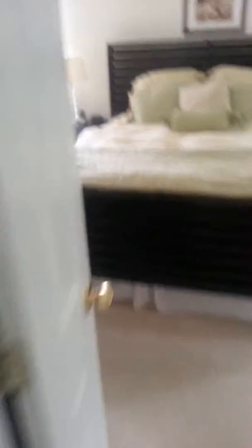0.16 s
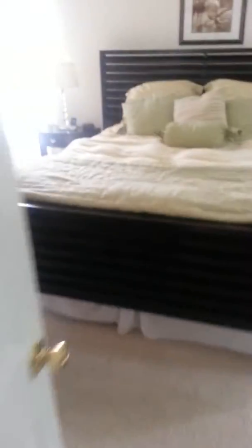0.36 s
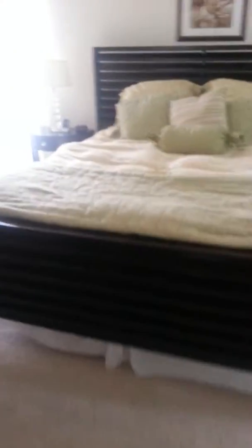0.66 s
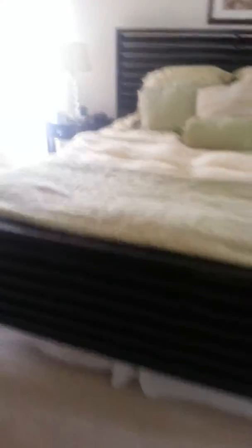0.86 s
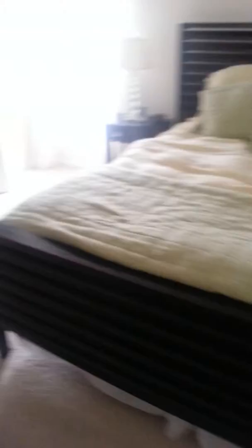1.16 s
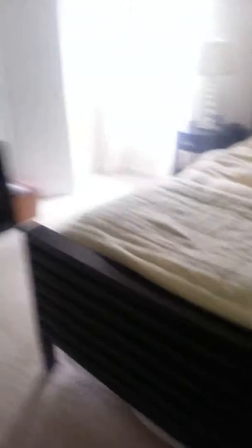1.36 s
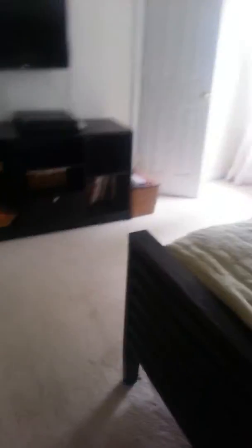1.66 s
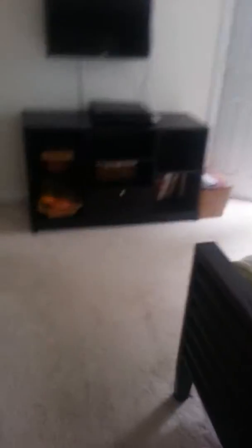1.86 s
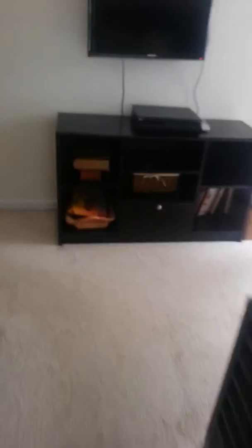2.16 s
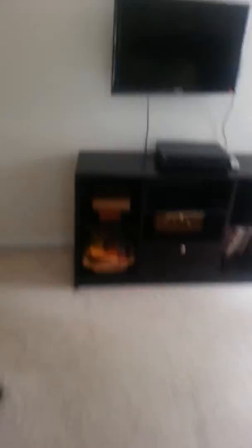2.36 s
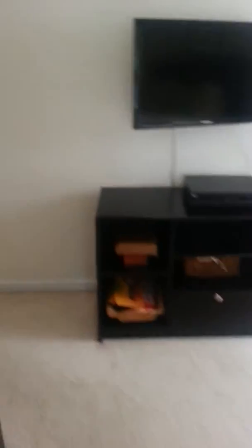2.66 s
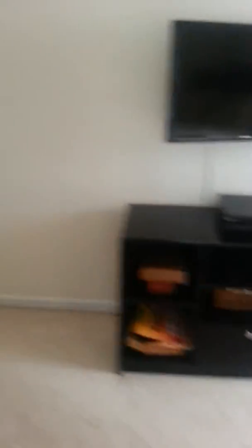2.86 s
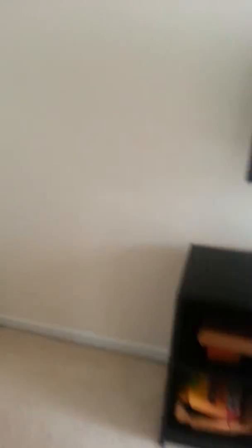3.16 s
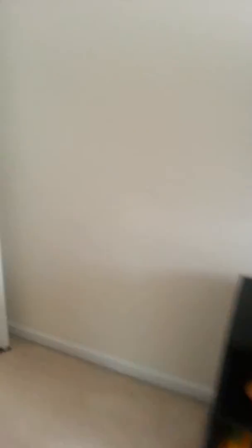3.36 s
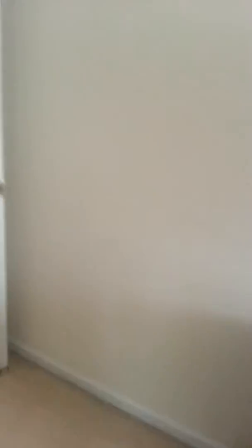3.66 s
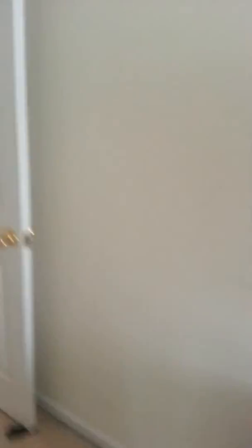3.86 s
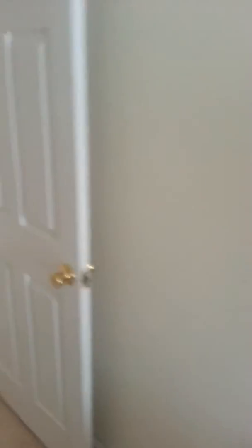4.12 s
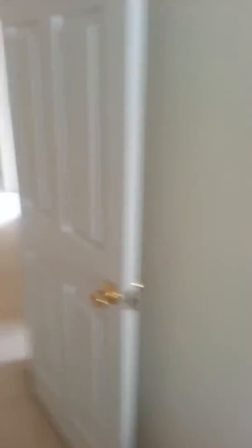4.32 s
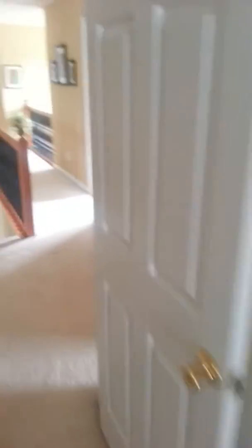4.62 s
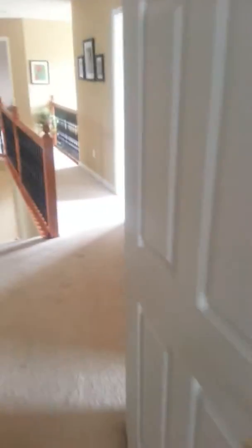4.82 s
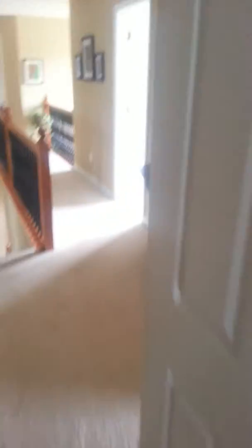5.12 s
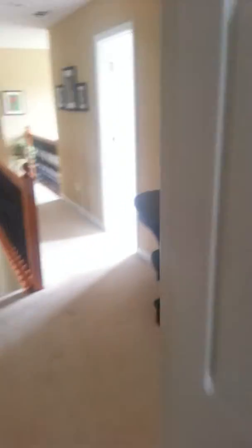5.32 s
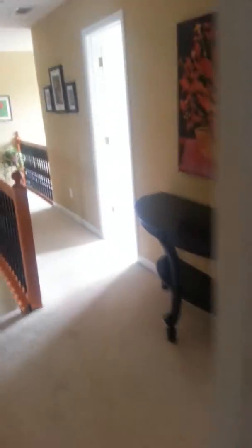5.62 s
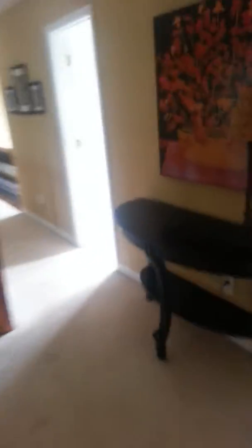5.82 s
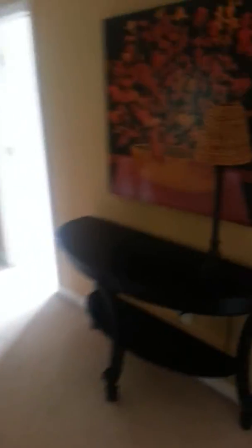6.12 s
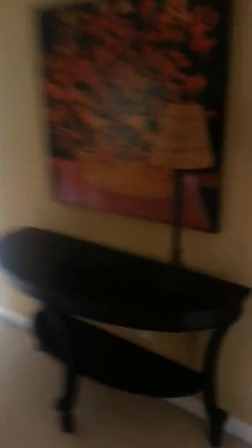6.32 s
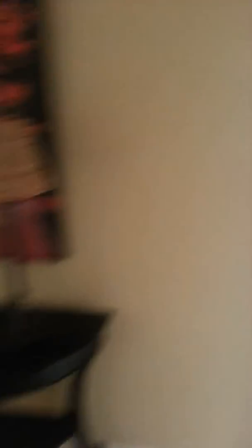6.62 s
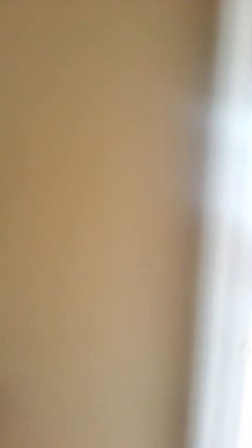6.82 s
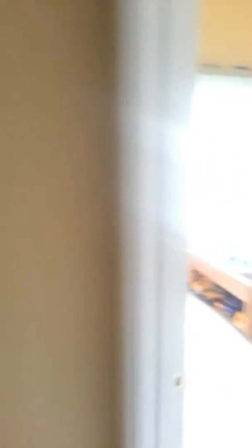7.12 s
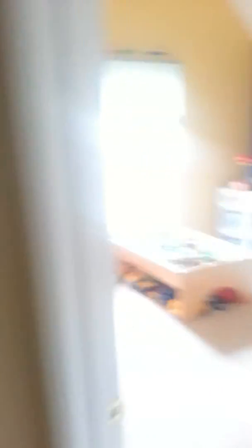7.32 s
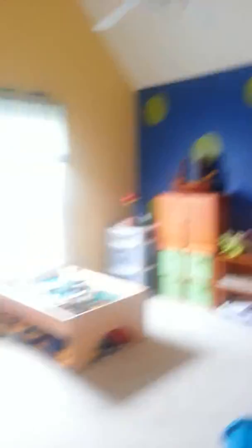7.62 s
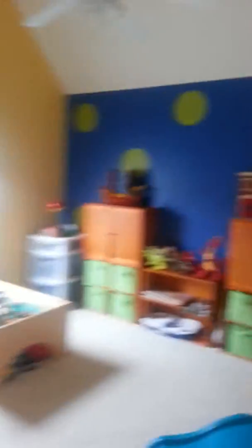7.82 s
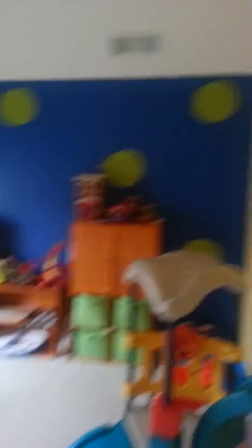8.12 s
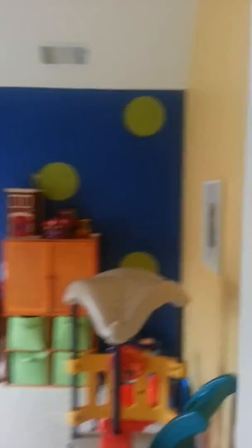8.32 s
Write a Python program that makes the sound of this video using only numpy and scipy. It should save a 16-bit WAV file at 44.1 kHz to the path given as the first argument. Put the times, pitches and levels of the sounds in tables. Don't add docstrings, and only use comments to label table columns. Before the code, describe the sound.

A hollow interior door bumps and latches with a sharp crack, then soft, uneven sandal steps scuff across carpet with small ticks and knocks.

```python
import sys
import numpy as np
from scipy import signal
from scipy.fft import rfft, irfft, next_fast_len
from scipy.io import wavfile
from scipy.ndimage import uniform_filter1d

SR = 44100
rng = np.random.default_rng(int(sys.argv[2]) if len(sys.argv) > 2 else 0)


def natural_amplitude(level_db):
    exponent = np.asarray(level_db, float) / 20
    return 10 ** exponent


def pcm_store(signal):
    levels = np.round(np.clip(np.atleast_2d(signal), -1, 1) * 32767)
    wavfile.write(sys.argv[1], SR, levels.astype(np.int16).T)


N = 373968

# (time [s], panel level [dB], latch level [dB], softness [s], shudder share [1])
BLOWS = [
    (.002, -38, -41.5, 0.0024, 0.14),
    (0.0486, -32.5, -38, 0.002, 0.016),
    (.069, -35, -62, 0.0022, .02),
    (.105, -41.5, -67, 0.0032, .05),
    (.14, -31.5, -72, 0.0019, 0.028),
    (0.2821, -28.5, -18, 0.0006, 0.4),
    (0.288, -35, -57, 0.00069, .02),
    (.316, -39.5, -59, 0.0014, 0.024),
    (.333, -35, -60, 0.0011, .02),
    (.43, -43, -62, 0.0013, 0.046),
]
# (frequency [Hz], level [dB], t60 [s])
PANEL_MODES = [(210, -0.5, 0.14), (252, 0.5, 0.13), (278, 1, 0.23), (291, -7, 0.22), (314, 3, 0.17),
               (349, -0.5, 0.17), (477, -7.5, 0.26), (580, -10.5, 0.45), (737, -24, 0.25)]
# (frequency [Hz], density [dB per Hz])
CRACK_SPECTRUM = [(500, -3), (900, -4), (1400, 1), (2500, -3.5), (4300, -8.5), (6700, 0.5), (8000, -8),
                  (10500, -22), (12000, -47)]
# (frequency [Hz], level [dB])
CRACK_PAN = [(3000, -5), (6000, -1.5)]


def door_blows():
    out, crack = np.zeros(N), np.zeros((2, N))
    count = 30000
    long_decay = fade(0.48, count)
    for s, panel_db, latch_db, soft, shudder in BLOWS:
        rattle = rng.standard_normal((4, count))
        push = shudder * rattle[0] * fade(0.38, count)
        width = max(int(soft * SR), 4)
        push[:width] += np.hanning(width)
        tilt = 8 * np.log2(soft / 0.001)
        panel = np.zeros(count)
        for hz, db, t60 in PANEL_MODES:
            panel += natural_amplitude(db - tilt * np.log2(hz / 260)) * ring(push, hz, t60)
        add(out, s, panel, panel_db)
        dying = (1 - fade(0.013, count)) * (fade(0.032, count) + 0.8 * long_decay)
        for port, noise in zip(crack, rattle[1::2]):
            add(port, s, colour(noise, CRACK_SPECTRUM) * dying, latch_db + 2.5)
        add(out, s, ring(rattle[2] * long_decay, 80, 0.044), latch_db - 26)
    crack[0] = colour(crack[0], CRACK_PAN)
    return out, crack


# (time [s], peak level [dB], pitch [Hz])
BOLT = [
    (0.2801, -12, 6840),
    (0.282, -32, 6900),
    (0.2837, -21, 6600),
    (.2872, -18.5, 6500),
    (0.288, -27, 7000),
    (0.292, -24.5, 6000),
    (0.2917, -17.5, 6400),
]
# (start [s], length [s], peak level [dB], from [Hz], to [Hz])
SQUEAK = (.212, .042, -64, 930, 1040)
# (start [s], length [s], peak level [dB], from [Hz], to [Hz])
BUMP = (.0635, .023, -25.5, 235, 185)
# (start [s], length [s], peak level [dB], from [Hz], to [Hz])
TOUCH = (.0487, .011, -26, 275, 250)
# (start [s], length [s], peak level [dB], from [Hz], to [Hz])
SAGS = [
    (.283, .03, -30, 370, 345),
    (.308, .026, -28, 310, 255),
    (.328, .017, -31, 300, 340),
    (.281, .03, -37, 88, 72),
    (.347, .02, -37, 240, 260),
    (.364, .028, -34.5, 310, 285),
    (.432, .022, -41, 320, 330),
]


def door():
    out, crack = door_blows()
    for s, db, hz in BOLT:
        add(out, s, burst(hz, cycles=8.5), db)
    for s, length, db, from_hz, to_hz in (SQUEAK, BUMP, TOUCH, *SAGS):
        add(out, s, glide(length, from_hz, to_hz), db)
    return signal.sosfilt(signal.butter(2, [70, 20000], "band", fs=SR, output="sos"), out), crack


# (time [s], drag level [dB], pressure [dB])
DRAG = [(0, -67.5, 28), (.5, -51.5, -2.5), (1.3, -79, 1), (1.95, -70.5, -3.5), (2.25, -64, 2),
        (2.65, -72, -6), (3.1, -65, -1), (3.75, -58.5, -7), (4.65, -68, -1.5), (5.02, -56.5, -4.5),
        (5.45, -66.5, 0.5), (5.75, -54, -3), (6.1, -68, -8), (6.45, -64, 10.5), (6.75, -78, 5),
        (7.27, -66, 6.5), (7.56, -71.5, 2), (8.48, -72, 3)]


def drag():
    s, drag_db, pressure_db = np.transpose(DRAG)
    t = np.arange(N) / SR
    drag_db = np.interp(t, s, drag_db) - 3.5
    pressure_db = np.interp(t, s, pressure_db)
    return natural_amplitude(drag_db), natural_amplitude(drag_db - 8.5 + 0.57 * pressure_db), natural_amplitude(drag_db + 0.5 + pressure_db)


# (time [s], hiss peak level [dB], crunch over hiss [dB], contact [s])
LANDINGS = [(.558, -48, -13, 0.01), (1.425, -50, 3, 0.042), (1.476, -55, -16, 0.056),
            (1.8148, -57, 2.5, 0.018), (2.0044, -52.5, 6, 0.061), (2.13, -51.5, -9, 0.058),
            (2.261, -47.5, 2, 0.066), (2.451, -42.5, 3, 0.041), (2.9, -42.5, -28, 0.037),
            (3.563, -46, 1, 0.02), (3.6262, -53, -1, 0.066), (4.141, -58.5, 13.5, 0.055),
            (4.262, -46, 3, 0.037), (4.819, -42.5, -10, 0.065), (5.057, -43.5, -21.5, 0.032),
            (5.122, -47, -9, 0.057), (5.457, -50, 0, 0.058), (5.617, -52.5, 5, 0.037),
            (5.651, -41.5, -25, 0.033), (6.078, -50, -19, 0.038), (6.19, -44, -28, 0.045),
            (6.335, -48, -24, 0.062), (6.593, -53, 8, 0.04), (7.003, -52, -1, 0.066),
            (7.2753, -56, 12, 0.036), (7.7474, -54.5, 5, 0.08), (7.852, -54, 7, 0.063),
            (8.189, -52, 5.5, 0.29), (8.3375, -70, 14, 0.049)]
# (time [s], hiss peak level [dB], sheen over hiss [dB], contact [s])
FLICKS = [(0.001, -51, 7, 0.046), (5.759, -40, 1, 0.019), (0.62, -41, 16, 0.036), (1.94, -51, 6, 0.04),
          (2.982, -49.5, 9.5, 0.055), (2.9845, -49, 12.5, .008), (3.027, -47, -21, 0.058),
          (3.289, -50.5, -16, 0.062), (3.6716, -52, -17, 0.046), (4.393, -53, -2, .06),
          (4.408, -48, 12, 0.023), (4.676, -50, -19, 0.021), (5.53, -42.5, -19, 0.012),
          (5.748, -34, 7, 0.022), (6.419, -39.5, 7.5, 0.025), (6.44, -47, 0, .045), (6.474, -47, 5, .015),
          (6.477, -53, -8, 0.13), (7.104, -50.5, 6, 0.03), (7.64, -44, 18.5, 0.0095),
          (7.635, -53, 0, 0.052), (8.019, -54, 11, 0.04)]


def land(hiss, scrape, crunch, sheen):
    strokes = [(s, db, 0, more, -35, c) for s, db, more, c in LANDINGS]
    strokes += [(s, db, -24, -27.5, more, c) for s, db, more, c in FLICKS]
    after = np.arange(9000) / SR
    for s, db, scrape_db, crunch_db, sheen_db, contact in strokes:
        release = 1 + (after / max(contact, 0.005)) ** 4
        shape = np.minimum(after / 0.0055, 1) * np.exp(-after / 0.092) / release
        add(hiss, s, shape, db - 13)
        add(scrape, s, shape, db + scrape_db - 10)
        add(crunch, s, shape, db + crunch_db - 15)
        add(sheen, s, shape, db + sheen_db - 20)


# (start [s], length [s], hiss level [dB], scrape over hiss [dB], crunch over hiss [dB])
SWISHES = [(0.309, 0.18, -56.5, -6, 9.5), (0.623, 0.12, -52, -2, -5), (1.575, 0.12, -71, 8, 5),
           (1.954, 0.18, -58.5, -6, -8.5), (3.606, 0.34, -51.5, -30, -12), (4.141, 0.18, -61, -2.5, -4),
           (4.46, 0.076, -63, -3, 3), (4.786, 0.045, -62.5, 4, -8), (4.857, 0.21, -59.5, -12, -12),
           (5.84, 0.18, -56.5, -21, -15), (5.841, 0.099, -76, 3, 28), (2.528, 0.054, -71, 0, 6),
           (3.66, 0.056, -64, -9, 1), (6.199, .11, -60.5, -4.5, -1), (6.802, 0.21, -63.5, 11, 5),
           (4.865, 0.055, -56, -23, -20), (7.217, 0.085, -81, 7, 15)]
# (start [s], length [s], hiss level [dB], scrape over hiss [dB], crunch over hiss [dB])
SCUFFS = [(4.812, 0.076, -60.5, 12.5, -0.5), (0.042, 0.073, -52, -4, 1.5), (0.0, 0.089, -60.5, -1, -2.5),
          (2.363, 0.087, -67, 7.5, 10), (2.521, 0.11, -65.5, 1, -2), (3.104, 0.15, -65, -3, 1),
          (3.43, 0.083, -68, 9, 3), (4.398, 0.12, -56.5, -28, -22), (4.52, 0.12, -59.5, -3, -0.5),
          (7.269, 0.26, -52.5, -34, -34), (8.074, 0.11, -70, 1, -2)]


def sweep(hiss, scrape, crunch, rumble):
    sweeps = [(0.59, *row) for row in SWISHES] + [(0.23, *row) for row in SCUFFS]
    after = np.arange(9000) / SR
    for rise, start, length, db, scrape_db, crunch_db in sweeps:
        phase = np.interp(after * 2, [0, rise * length, length], [0, np.pi / 2, np.pi])
        shape = np.sin(phase).repeat(2) ** 1.84
        add(hiss, start, shape, db)
        add(scrape, start, shape, db + scrape_db)
        add(crunch, start, shape, db + crunch_db)
        add(rumble, start, shape, db + crunch_db - 4.5)


# (frequency [Hz], density [dB per Hz])
HISS = [(1180, -10.5), (2000, -10), (4100, -8), (5070, -5.5), (6120, -3.5), (6890, -1), (9060, -8),
        (13900, -12.5), (14700, -29.5), (15400, -63.5)]
SHEEN = [(6000, -22.5), (9500, -2.5), (13500, -6.5), (15000, -16)]
SCRAPE = [(500, -55.5), (1050, 5), (1400, 0), (2200, -6), (3200, -7), (5000, -27)]
CRUNCH = [(150, -4), (350, 3.5), (600, 4.5), (1000, -1.5), (1800, -31)]
RUMBLE = [(20, -1), (50, -4.5), (120, -5.5), (250, -3), (500, -11), (900, -18.5), (1500, -57)]


def brush():
    hiss, scrape, rumble = drag()
    crunch, sheen = np.zeros((2, N))
    land(hiss, scrape, crunch, sheen)
    sweep(hiss, scrape, crunch, rumble)
    fine = np.array([level(colour(fibres(2.67, 0.59, 60), HISS), 0) for _ in range(3)])
    near = natural_amplitude(-12.5) * hiss * fine[0]
    near += sheen * level(colour(fibres(2.9, 0.52, 54), SHEEN), 0)
    near += scrape * level(colour(fibres(3.0, 1.5, 70), SCRAPE), 0)
    near += crunch * level(colour(fibres(3.8, 1.5, 60), CRUNCH), 0)
    near += rumble * level(colour(fibres(3.0, 1.8, 40), RUMBLE), 0)
    return near, hiss * natural_amplitude(3.5) * fine[1:]


# (time [s], peak level [dB], board pitch [Hz], body weight over peak [dB])
HEELS = [(.594, -40, 223, -22), (.699, -43, 182, -24), (.916, -48, 165, -20), (1.482, -48, 220, -22),
         (1.585, -50, 157, -12), (2.037, -46.5, 230, -22), (2.456, -45.5, 219, -18), (3.14, -48, 290, -12),
         (3.268, -59, 167, -11), (4.074, -37, 337, -18), (4.261, -46.5, 196, -10), (4.821, -64, 231, 5),
         (5.054, -43, 242, -22), (5.138, -45.5, 161, -13), (5.462, -47, 175, -18), (5.821, -43.5, 148, -16),
         (5.919, -42, 153, -21), (6.081, -45, 250, -24), (6.188, -42, 187, -16), (6.606, -41, 315, -20),
         (6.85, -45, 251, -10), (7.002, -43.5, 131, -18), (7.284, -43.5, 255, -27), (7.744, -49, 243, -8),
         (7.916, -52, 136, -21)]
# (time [s], peak level [dB], board pitch [Hz], body weight over peak [dB])
KNOCKS = [(1.6315, -38.5, 400, -23), (2.142, -54, 372, -8), (2.276, -48.5, 430, -7),
          (2.373, -45.5, 523, -28), (2.91, -44.5, 404, -20), (3.118, -41, 760, -30), (3.433, -57, 318, -10),
          (3.564, -49.5, 480, -5), (3.768, -43.5, 540, -24), (4.49, -61, 358, -1),
          (4.558, -34.5, 645, -27.5), (4.929, -56, 538, 1), (4.977, -42, 636, -25), (5.616, -44, 530, -16),
          (5.662, -37, 504, -28), (5.883, -37, 604, -23), (6.358, -37.5, 327, -17),
          (6.885, -44, 290, -24.5), (7.662, -51.5, 348, -4.5), (8.086, -45, 317, -14),
          (8.19, -42, 387, -20)]


def heels():
    out = np.zeros(N)
    count = 8000
    for s, db, hz, weight_db in list(HEELS) + list(KNOCKS):
        t60 = 0.077 * (250 / hz) ** 0.75
        chance = rng.standard_normal((2, count))
        jolts = chance[0] * (np.abs(chance[1]) > 2.2) * fade(1.35 * t60, count)
        jolts *= np.minimum(np.arange(count) / SR / 0.005, 1)
        jolts[0] = 1
        jolts = signal.lfilter([1], [1, -0.9], jolts)
        board = ring(jolts, hz, 0.37 * t60) + ring(jolts, 1.7 * hz, 0.0093)
        board += 1.63 * ring(jolts, 1100, 0.0022)
        joists = ring(ring(jolts, 59, 0.033), 61.5, 0.07)
        joists += ring(ring(jolts, 77, 0.016), 100, 0.065)
        add(out, s, board, db)
        add(out, s, joists, db + weight_db + 5.5)
    return signal.sosfilt(signal.butter(2, 50, "high", fs=SR, output="sos"), out)


# (time [s], peak level [dB], pitch [Hz])
TICKS = [(0.5673, -52, 2030), (0.775, -48.5, 1820), (1.4298, -50, 1940), (1.478, -51.5, 2150),
         (2.1464, -40.5, 1800), (2.189, -49, 1700), (2.2806, -41, 1720), (2.4655, -45.5, 1550),
         (2.9138, -42, 1450), (2.2118, -48, 1550), (3.5771, -41, 1880), (3.6754, -46.5, 1960),
         (4.0777, -46, 1020), (4.2648, -41, 1410), (4.4095, -55, 2370), (0.05, -34, 4550),
         (3.038, -46, 5900), (4.9279, -36.5, 1910), (4.9735, -41.5, 2040), (5.0615, -47, 1610),
         (5.141, -44.5, 1100), (5.6613, -36, 1860), (5.7513, -38, 2570), (6.082, -47.5, 1000),
         (6.1985, -41.5, 2680), (6.354, -42, 1850), (6.5366, -55, 1870), (7.02, -47.5, 1780),
         (7.28, -43.5, 1160), (7.87, -47.5, 1840), (1.5184, -56, 1980), (2.5377, -60, 2030),
         (2.9688, -59, 1690), (4.5555, -44, 1100), (4.574, -47, 2600), (4.986, -43, 1960),
         (5.148, -50, 1030), (5.153, -50, 980), (1.4292, -55, 4200), (5.757, -42, 4800), (5.764, -48, 3100),
         (5.6612, -39, 4600), (1.478, -50.5, 1010), (6.206, -50, 2700), (7.026, -53, 1700),
         (7.2835, -46.5, 1020), (7.878, -52, 1730), (6.95, -54, 2300)]
# (time [s], peak level [dB], pitch [Hz])
SNAPS = [(2.4692, -40, 2300), (2.4745, -45, 2600), (2.3755, -43, 970), (2.1, -49, 1000),
         (2.9138, -42, 2600), (3.3, -38, 8300), (4.8, -40, 2600), (4.4, -42, 2200), (5.751, -35, 4100),
         (7.647, -39, 9000), (5.7645, -34, 7500), (3.3, -48, 1800), (0.049, -37.5, 2800),
         (4.418, -39, 9000), (6.9105, -40, 1200), (5.972, -49, 2300), (2.9025, -46, 3000),
         (4.563, -42, 1300)]
# (time [s], peak level [dB], pitch [Hz])
POPS = [(1.503, -47.5, 230), (1.431, -53, 330), (1.4775, -45, 330), (1.441, -54, 200), (2.212, -47.5, 400),
        (2.26, -53, 260), (2.453, -42, 255), (2.47, -42, 330), (2.538, -55, 400), (2.56, -53, 350),
        (3.143, -44.5, 300), (3.219, -49.5, 300), (3.269, -50, 220), (1.824, -56.5, 700), (6.336, -56, 250),
        (3.691, -45, 250), (3.715, -45, 250), (4.077, -43, 280), (4.465, -52, 600), (4.495, -41, 800),
        (5.002, -44, 300), (5.055, -44, 278), (5.199, -48, 350), (5.728, -47, 900), (5.885, -46, 650),
        (5.911, -37, 298), (6.081, -48, 420), (6.6028, -34.5, 423), (6.91, -34, 700), (6.997, -49.5, 230),
        (7.024, -49, 250), (7.237, -51, 350), (7.6779, -49.5, 520), (8.192, -45, 420), (8.267, -48.5, 400)]
# (start [s], length [s], peak level [dB], from [Hz], to [Hz])
CHIRPS = [(4.931, .009, -40.5, 1700, 1560), (5.665, 0.0082, -41, 1690, 1480),
          (5.7525, .012, -41, 2350, 2240), (3.119, .01, -46.5, 800, 690), (3.77, 0.0124, -42.5, 530, 1200),
          (4.409, .014, -52, 2350, 2150), (5.771, .007, -47, 2250, 2300),
          (6.194, 0.0122, -44.5, 3050, 2500), (6.192, .012, -48, 1750, 1680), (6.359, 0.023, -40, 375, 295),
          (4.988, .009, -45.5, 650, 560), (4.876, .014, -52.5, 790, 730)]


def sandals():
    out = np.zeros(N)
    bounce_s = 0.0041
    delay = np.arange(2000) / SR / bounce_s
    pop_cycles = 1.5
    for s, db, hz in TICKS:
        smear = rng.standard_normal(2000) * delay ** 2 * np.exp(-2 * delay)
        bounce = ring(smear, 0.94 * hz, 0.0037) + 0.41 * ring(smear, 2.16 * hz, 0.003)
        add(out, s, burst(0.45 * hz, pop_cycles), db - 4)
        add(out, s, burst(hz, cycles=3.6), db + 6.5)
        add(out, s, bounce, db - 1)
    for s, db, hz in SNAPS:
        add(out, s, burst(hz, cycles=2.2), db)
    for s, db, hz in POPS:
        add(out, s, -burst(hz, pop_cycles), db)
    for s, length, db, from_hz, to_hz in CHIRPS:
        add(out, s, glide(length, from_hz, to_hz), db)
    return out


def echoes(x):
    count = 30000
    mid, side = rng.standard_normal((2, count))
    tail = mid + colour(side, [(300, -6.5), (900, 2)]) * np.array([[1], [-1]])
    low = colour(tail, [(700, -5.5), (3000, -30)])
    tail = low * fade(0.28, count) + (tail - low) * fade(0.16, count)
    tail[:, :150] = 0
    tail /= np.sqrt(np.mean(np.sum(tail ** 2, axis=1)))
    return signal.fftconvolve(x[None], tail, axes=1)[:, :N]


# (frequency [Hz], density [dB per Hz])
AIR = [(15, -41), (25, -27), (54, 3.5), (245, -0.5), (521, -4), (580, -1.5), (891, -6.5), (1840, -7),
       (4230, -14.5), (6860, -20.5), (9230, -20.5), (14200, -14), (15400, -20.5)]
# (time [s], level [dB])
HUM = [(0, -88), (4.0, -84), (6.4, -81), (7.0, -74), (7.5, -71), (8.48, -71)]
# (time [s], frequency [Hz], level [dB])
WHISTLE = [
    [(8.06, 5320, -82), (8.102, 5230, -78), (8.15, 5224, -82), (8.2, 5222, -77), (8.278, 5200, -78),
     (8.306, 5219, -84), (8.364, 5222, -71), (8.47, 5220, -85.5)],
    [(8.3, 4115, -87), (8.322, 4117, -88), (8.334, 4117, -84), (8.47, 4118, -81)],
]


def house():
    t = np.arange(N) / SR
    mid, side = colour(rng.standard_normal((2, N)), AIR) * natural_amplitude(walk(2.85))
    side = colour(side, [(150, 7.7), (900, 0.84)])
    air = level(mid + side * np.array([[1], [-1]]), -74)
    hum_db = np.interp(t, *np.transpose(HUM)) + 0.8 * walk(8)
    tones = natural_amplitude(hum_db) * np.sin(2 * np.pi * 118 * t + 1.13 * walk(4.3))
    for line in WHISTLE:
        s, hz, db = np.transpose(line)
        rise = np.clip((t - s[0]) / 0.04, 0, 1)
        loudness = natural_amplitude(np.interp(t, s, db) + 3 + 0.3 * walk(30))
        phase = 2 * np.pi * np.cumsum(np.interp(t, s, hz)) / SR
        tones += rise * loudness * np.sin(phase)
    return air + tones


# (frequency [Hz], lead [samples])
LEFT_LEAD = [(100, 8), (700, 8), (1100, 19), (15000, 19)]


def colour(x, points, lead=0):
    hz, db = np.transpose(points)
    size = next_fast_len(x.shape[-1])
    f = np.arange(size // 2 + 1) * SR / size + 1
    turn = np.exp(2j * np.pi * f / SR * lead * np.interp(f, *np.transpose(LEFT_LEAD)))
    gain = natural_amplitude(np.interp(np.log(f), np.log(hz), db))
    return irfft(rfft(x, size) * gain * turn, size)[..., :x.shape[-1]]


def level(x, db):
    return x * natural_amplitude(db) / np.sqrt(np.mean(x ** 2))


def fade(t60, count):
    return np.exp(-np.log(1000) * np.arange(count) / SR / max(t60, 0.003))


def ring(x, hz, t60):
    pole = np.exp(2j * np.pi * hz / SR - np.log(1000) / (max(t60, 0.003) * SR))
    return signal.lfilter([1], [1, -pole], x).imag


def burst(hz, cycles):
    turn = np.arange(int(cycles * SR / hz) + 2) * hz / SR
    return -np.sin(2 * np.pi * turn) * np.sin(np.pi * np.minimum(turn / cycles, 1) ** 0.8) ** 2


def glide(length, from_hz, to_hz):
    hz = np.linspace(from_hz, to_hz, int(length * SR))
    return np.sqrt(np.hanning(len(hz))) * np.sin(2 * np.pi * np.cumsum(hz) / SR)


def walk(rate):
    k = int(SR / rate)
    held = np.repeat(rng.standard_normal(N // k + 1), k)
    return 3.45 * uniform_filter1d(uniform_filter1d(held, k), k)[:N]


def fibres(grain_db, flicker_db, rate):
    grain = np.minimum(rng.exponential(size=N), 6)
    return rng.standard_normal(N) * natural_amplitude(grain_db * grain + flicker_db * walk(rate))


def add(track, s, sound, db):
    i = int(s * SR)
    n = min(len(sound), N - i)
    track[i:i + n] += natural_amplitude(db) * sound[:n] / np.abs(sound).max()


def scene():
    slam, crack = door()
    near, spread = brush()
    feet = near + heels() + sandals()
    flat = [(20, 0), (20000, 0)]
    left = colour(feet, flat, lead=0.95) + natural_amplitude(-2.5) * colour(slam, flat, lead=0.93)
    ports = np.array([left, feet + slam])
    return ports + echoes(natural_amplitude(-8.5) * feet + natural_amplitude(-2.5) * slam) + spread + crack + house()


def top_cut(x):
    return signal.sosfilt(signal.butter(12, 15520, fs=SR, output="sos"), x)


# (frequency [Hz], level [dB])
LEFT_GAIN = [(60, -3), (200, 4), (2400, 5.5), (4400, 5), (6800, -4.5), (9000, 0.5), (15000, 3)]


def record(dry):
    ports = []
    for port, sign in zip(dry, (1, -1)):
        ports.append(colour(port, [(hz, sign * db / 2) for hz, db in LEFT_GAIN]))
    ports = signal.sosfilt(signal.butter(3, 56.3, "high", fs=SR, output="sos"), np.array(ports))
    ports = signal.sosfilt(signal.ellip(6, 0.3, 25, 14750, fs=SR, output="sos"), ports)
    return top_cut(ports)


dry = scene()
out = record(dry)
pcm_store(out)
```